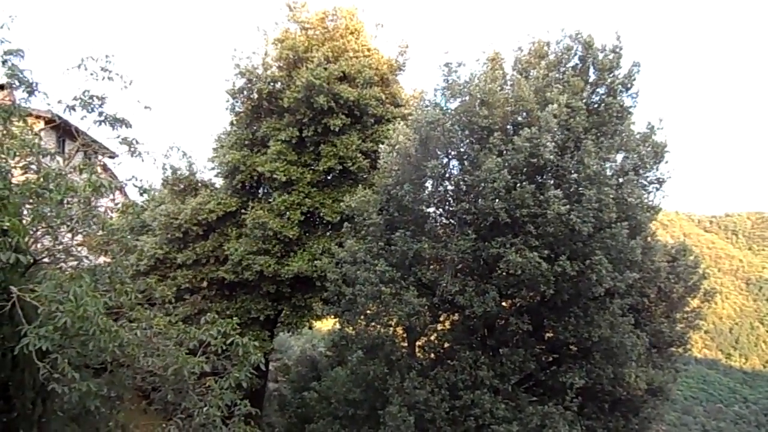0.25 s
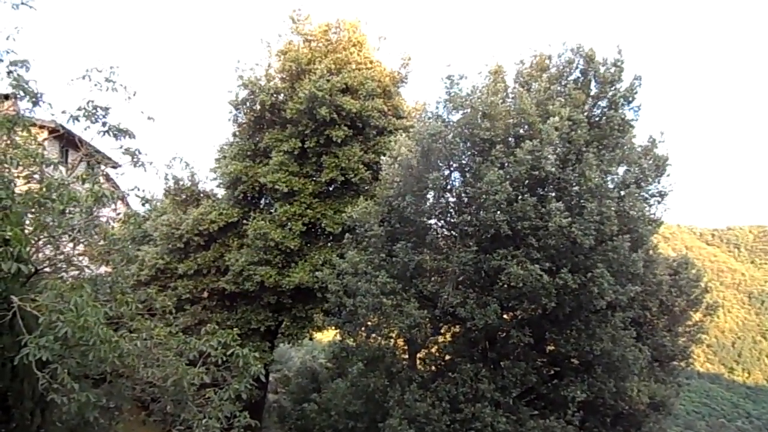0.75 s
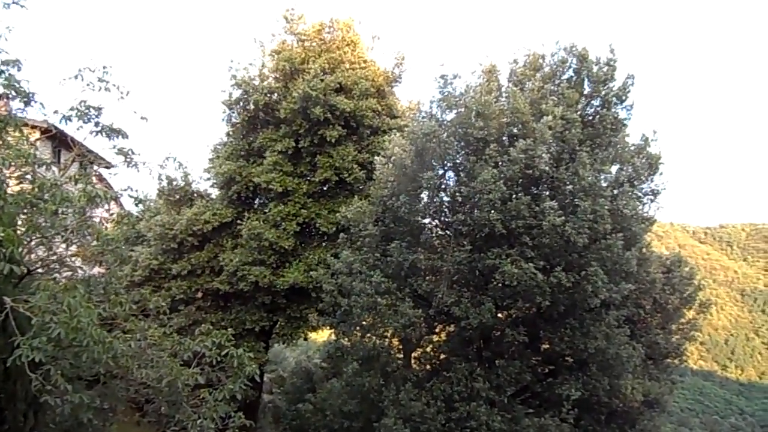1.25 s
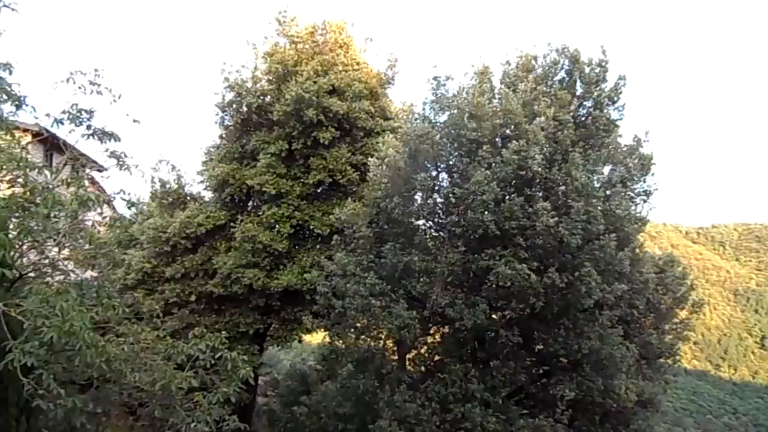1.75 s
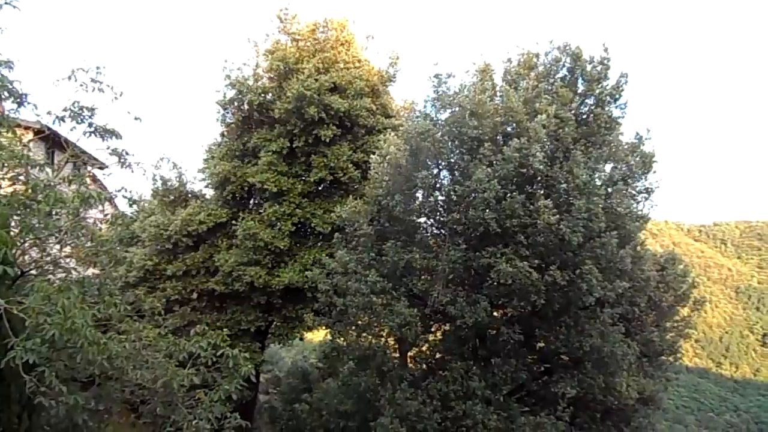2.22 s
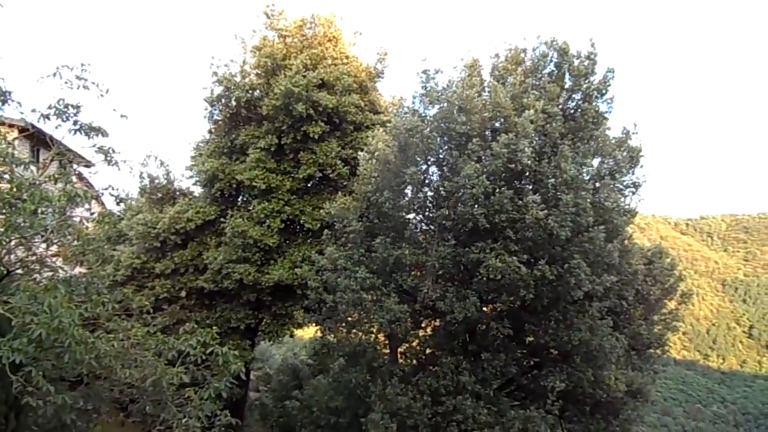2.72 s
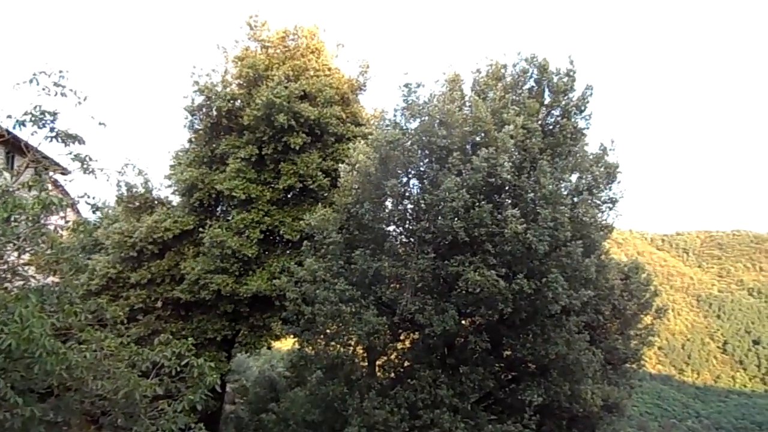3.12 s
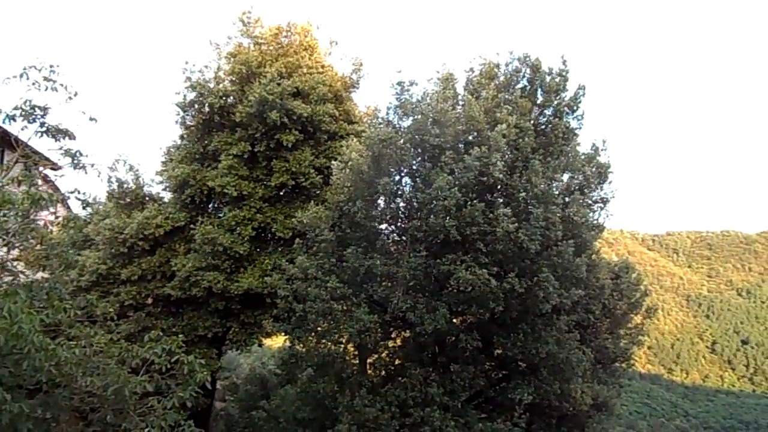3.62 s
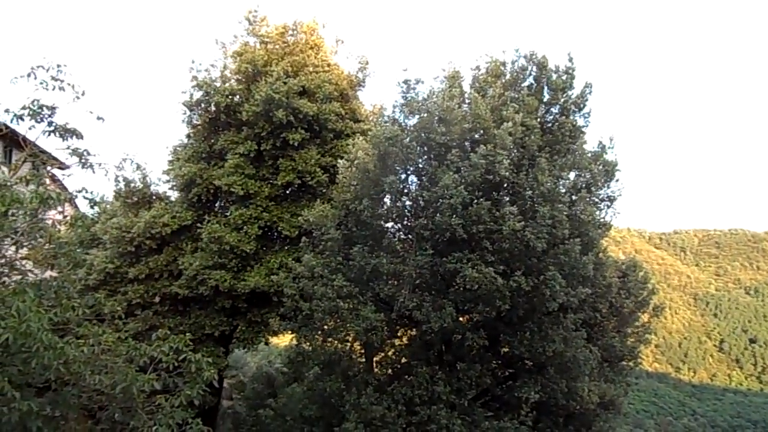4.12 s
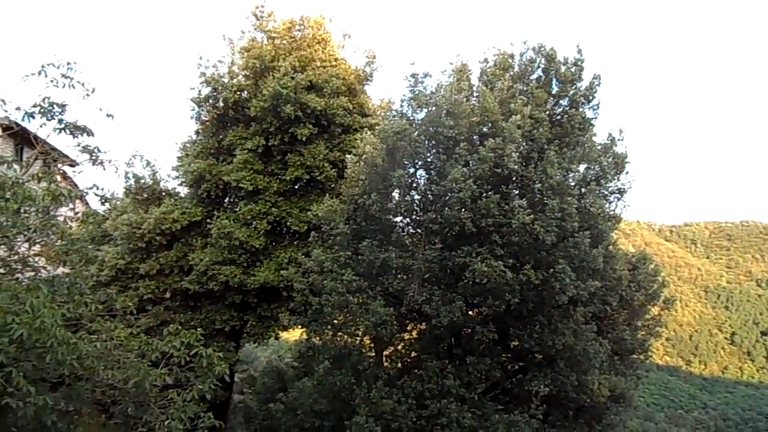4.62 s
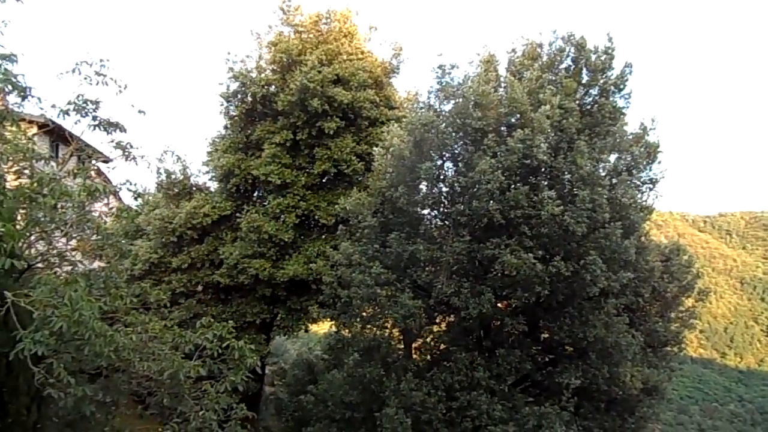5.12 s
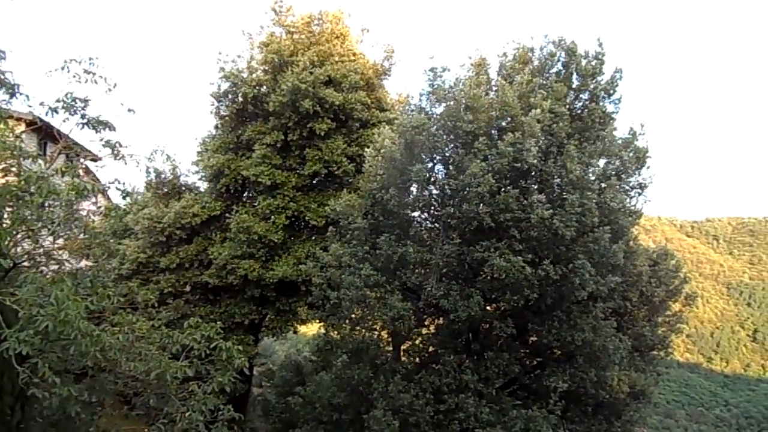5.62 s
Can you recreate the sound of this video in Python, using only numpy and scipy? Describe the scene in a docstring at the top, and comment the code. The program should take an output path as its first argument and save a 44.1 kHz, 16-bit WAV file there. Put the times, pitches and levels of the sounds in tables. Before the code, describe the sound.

On a quiet wooded hillside, faint distant whistles come first, then a songbird builds a fluty, warbling phrase of quick clear notes and slurs. A second bird adds sharp, raspy chips, the strongest near the end after the song stops. Leaves and slopes return a soft echo. A low hum, quiet air hiss and thin camera whine stay underneath, with a tiny tick and soft thumps late.

```python
"""On a quiet hillside a songbird warbles one fluty phrase from the trees; leaves and slopes scatter it back.
Its notes are gliding near-sines: clear whistles linked by slurs under a fast warble.
A second bird calls sharp two-voiced chips with a noisy rasp, and a far one whistles faintly at first.
Under them lie still air made of shaped noise, a low hum, a thin tick and a few soft thumps,
and the thin whine of the camera, made of steady tones and a narrow band of noise."""
import sys
import numpy as np
from scipy import signal
from scipy.fft import rfft, irfft
from scipy.io import wavfile

SR = 44100
rng = np.random.default_rng(int(sys.argv[2]) if len(sys.argv) > 2 else 0)


def to_wav(s):
    """Save 16-bit WAV."""
    ch = np.atleast_2d(s).T  # columns
    pcm = np.round(np.clip(ch, -1, 1) * 32767)  # PCM
    wavfile.write(sys.argv[1], SR, pcm.astype(np.int16))


N = 258426
TIME = np.arange(N) / SR


def gain_of(db):
    """Turns decibels into an amplitude factor."""
    return 10 ** (np.asarray(db) / 20)


def evened(x):
    """Scales a sound to an average (rms) strength of 1."""
    return x / np.sqrt(np.mean(x ** 2) + 1e-20)


def coloured(points):
    """Noise whose spectrum runs through (Hz, dB) points, at rms 1."""
    hz, db = np.transpose(points)
    shape = np.interp(np.log(np.fft.rfftfreq(N, 1 / SR) + 1), np.log(hz + 1), db)
    spectrum = rfft(rng.standard_normal(N)) * gain_of(shape)
    return evened(irfft(spectrum, N))


def band(hz, width_hz):
    """Noise in one bell-shaped band, at rms 1; centred on zero it is a random drift."""
    offset = (np.fft.rfftfreq(N, 1 / SR) - hz) / width_hz
    spectrum = rfft(rng.standard_normal(N)) * np.exp(-2 * offset ** 2)
    return evened(irfft(spectrum, N))


def background():
    """Still air as shaped noise, a low machine hum and the camera's steady whine."""
    # Spectrum of the still air. Each row: frequency in Hz, relative level in dB per Hz.
    air_spectrum = [(3, 2), (13, 5.5), (35, 0.5), (70, -6), (140, -7.5), (260, -11.5), (470, -14),
                    (760, -17), (2100, -22), (7000, -27), (13000, -28), (15500, -27.5), (16400, -27),
                    (16800, -31)]
    # Narrow noise bands of the drone and the whine. Each row: centre in Hz, width in Hz, level in dB.
    drone_bands = [(100, 12, -72.5), (543.5, 12.5, -81), (598, 32, -80.5), (15700, 300, -82)]
    # Steady tones of the hum. Each row: frequency in Hz, level in dB.
    hum_tones = [(30, -80.5), (60, -76), (100, -65)]
    # Cluster of thin tones in the camera whine. Each row: frequency in Hz, level in dB.
    whine_tones = [(11985.3, -86), (15734, -90), (15795.4, -90), (15856.8, -86), (15918.1, -85),
                   (15979.4, -85), (16040.8, -77.5), (16102.1, -77.5), (16163.5, -91)]
    air_db = -59
    air = gain_of(air_db) * coloured(air_spectrum)
    drone = sum(gain_of(db) * band(hz, width) for hz, width, db in drone_bands)
    tones = np.zeros(N)
    for hz, db in hum_tones + whine_tones:
        start_turn = rng.random()
        tones += np.sqrt(2) * gain_of(db) * np.sin(2 * np.pi * (hz * TIME + start_turn))
    return air + drone + tones


def knocks(rise_s=0.0056):
    """A thin tick and soft thumps: quickly damped noise bursts, each in its own band."""
    # Each row: start in seconds, level before the rise and decay in dB, centre in Hz, width in Hz,
    # decay time in seconds.
    bursts = [(3.688, -49, 13570, 1310, 0.0044), (4.108, -54, 577, 79, 0.03), (4.765, -59, 240, 80, .025),
              (5.215, -63, 200, 80, .025)]
    out = np.zeros(N)
    for start, db, hz, width, decay_s in bursts:
        age = np.maximum(TIME - start, 0)
        envelope = (1 - np.exp(-age / rise_s)) * np.exp(-age / decay_s)
        out += gain_of(db) * envelope * band(hz, width)
    return out


def hillside(x, leaves_db, slope_db, leaves_t60=0.35, slope_t60=0.85, flutter=0.47):
    """Direct sound, a few near echoes, quick scatter from foliage and a long, fluttering tail from the slopes."""
    # Near reflections from trunks, wall and ground. Each row: delay in seconds, level in dB.
    reflections = [(.0065, -14.5), (.013, -13), (.02, -14), (.046, -18)]
    t = TIME[:SR]
    # t60: seconds for the decay to fall by 60 dB
    leaves = evened(rng.standard_normal(SR) * gain_of(-60 * t / leaves_t60) * (1 - np.exp(-t / 0.0042)))
    slope = evened(rng.standard_normal(SR) * gain_of(-60 * t / slope_t60) * (1 - np.exp(-t / 0.018)))
    near = gain_of(leaves_db) * leaves / np.sqrt(SR)
    far = gain_of(slope_db) * slope / np.sqrt(SR)
    for delay_s, db in reflections:
        near[round(delay_s * SR)] += gain_of(db)
    near_sound = signal.fftconvolve(x, near)[:N]
    far_sound = signal.fftconvolve(x, far)[:N]
    return x + near_sound + far_sound * (1 + flutter * band(0, 110))


def swell(progress, crest, ends_db):
    """Loudness of a note in dB: it grows to a rounded crest, then falls away."""
    crest = np.clip(crest, .05, .95)
    before = np.maximum(crest - progress, 0) / crest
    after = np.maximum(progress - crest, 0) / (1 - crest)
    return ends_db[0] * before ** 2 + ends_db[1] * after ** 2


def buzz(start, length, from_hz, to_hz, level_db, crest, depth_hz, count=40):
    """A slur slides evenly between two pitches under a fast warble: rows (s, Hz, dB, warble Hz)."""
    progress = np.linspace(0, 1, count)
    hz = from_hz + (to_hz - from_hz) * progress
    db = level_db + swell(progress, crest, ends_db=(-10.5, -10.5))
    return np.column_stack([start + length * progress, hz, db, np.full(count, depth_hz)])


def whistle(start, length, opening_hz, held_hz, closing_hz, level_db, crest, count=40):
    """A clear note scoops onto its held pitch and bends away at the end: rows (s, Hz, dB, warble Hz)."""
    scoop_power, bend_power = 3.0, 3.004  # higher powers keep the glides closer to the note's ends
    progress = np.linspace(0, 1, count)
    scoop = (opening_hz - held_hz) * (1 - progress) ** scoop_power
    bend = (closing_hz - held_hz) * progress ** bend_power
    db = level_db + swell(progress, crest, ends_db=(-10, -10.5))
    return np.column_stack([start + length * progress, held_hz + scoop + bend, db, np.zeros(count)])


def syrinx(notes, warble_hz, jitter, throb_per_hz=0.0016):
    """The bird's voice organ glides through each note and flutters in rough parts: phase and loudness."""
    pitch, loud, depth = np.zeros((3, N))
    for note in notes:
        s, hz, db, warble = np.transpose(note)
        on = (TIME > s[0]) & (TIME < s[-1])
        pitch[on] = np.interp(TIME[on], s, hz)
        depth[on] = np.interp(TIME[on], s, warble)
        # soft edges, 3.3 ms long
        edge = np.clip(np.minimum(TIME[on] - s[0], s[-1] - TIME[on]) / 0.0033, 0, 1)
        loud[on] = gain_of(np.interp(TIME[on], s, db)) * np.sin(edge * np.pi / 2) ** 2
    # the warble's speed wanders around warble_hz
    flutter = 2 * np.pi * np.cumsum(warble_hz * (1 + .42 * band(0, 118.8))) / SR
    pitch = pitch * (1 + jitter * band(0, 405)) + depth * np.sin(flutter)
    # a deep warble also throbs: loudest on each upswing
    loud = loud * (1 + np.tanh(throb_per_hz * depth) * np.cos(flutter))
    return 2 * np.pi * np.cumsum(pitch) / SR, loud


def far_bird(level_db=-2, shake=0.34):
    """Faint, unsteady whistles from deeper in the wood: warbled sines with a shaking level."""
    # Each row: start in seconds, length in seconds, first pitch in Hz, last pitch in Hz,
    # level in dB before level_db is added, loudest point from 0 to 1, warble depth in Hz.
    slurs = [ (.012, .055, 2480, 2100, -61, .65, 80), (.176, 0.044, 2470, 2090, -60.5, .6, 70),
             (.342, 0.083, 2760, 2200, -67.5, .2, 270), (.765, 0.034, 3020, 3760, -64, .5, 9.6),
             (.988, .058, 3126, 2700, -62.5, .35, 180), (1.055, 0.078, 2830, 2530, -62, 0.37, 30), ]
    phase, loud = syrinx([buzz(*row) for row in slurs], warble_hz=131.5, jitter=0.011)
    return np.sqrt(2) * gain_of(level_db) * loud * (1 + shake * band(0, 150)) * np.sin(phase)


def chips(rasp_s=.021, overtone_db=-21, spread_hz=1500):
    """Both sides of the syrinx sweep upward at once, with hoarse overtones, inside a short rasp."""
    # The calls. Each row: time in seconds, tone level in dB, rasp level in dB, pitch factor.
    calls = [(.594, -65, -67.5, 1.04), (2.457, -58.5, -63, 0.96), (3.127, -50, -61.5, 1.02),
             (3.797, -49, -58.5, 1.01), (5.007, -43.5, -53.5, 1.016)]
    # The two sides of the syrinx. Each row: seconds from the call's time, pitch in Hz before the
    # pitch factor, level in dB on top of the tone level, warble depth in Hz.
    low_side = [(-.008, 2750, -22, 27), (.004, 3280, -12, 20), (.011, 3828, -1.5, 20),
                (.018, 4040, -0.5, 50), (.025, 4000, -2, 120)]
    high_side = [(-.036, 3183, -15, 60), (-.016, 3625, -22, 190), (-.005, 4086, -6, 95),
                 (.003, 4870, -4.5, 20), (.011, 5480, -10.5, 20), (.024, 5610, -7, 22)]
    # Spectrum of the rasp. Each row: frequency in Hz, relative level in dB per Hz.
    rasp_spectrum = [(1800, -45), (2800, -4.5), (3900, -0.5), (5700, -7.5), (6400, -20), (8700, -17),
                     (12500, -24), (16000, -32)]
    out, rasp = np.zeros(N), coloured(rasp_spectrum)
    for side in (low_side, high_side):
        notes = []
        for s, level, _, factor in calls:
            notes.append([(s + dt, hz * factor, level + db, warble) for dt, hz, db, warble in side])
        phase, loud = syrinx(notes, warble_hz=261, jitter=0.00753)
        overtones = (np.sin(2 * phase) + np.sin(3 * phase)) / np.sqrt(2)
        # random changes in strength make the overtones hoarse
        hoarse = gain_of(overtone_db) * overtones * band(0, spread_hz)
        out += np.sqrt(2) * loud * (np.sin(phase) + hoarse)
    for s, _, rasp_db, _ in calls:
        out += gain_of(rasp_db) * rasp * np.exp(-.5 * ((TIME - s) / rasp_s) ** 2)
    return out


def singer(notes, overtone_db=-30, glint_hz=12150, glint_width_hz=900, glint_spread_hz=450,
           shake=0.29, firm_db=-43):
    """A fluty near-sine; overtones sound faintly and hoarsely where they pass a resonance near 12 kHz."""
    phase, loud = syrinx(notes, warble_hz=138.8, jitter=0.0058)
    # softly blown parts shake, full notes hold firm
    loud = loud * (1 + shake * band(0, 320) / (1 + (loud / gain_of(firm_db)) ** 2))
    hz = np.gradient(phase) * SR / (2 * np.pi)
    glint = np.zeros(N)
    for k in range(3, 7):
        glint += np.sin(k * phase) / (1 + ((k * hz - glint_hz) / glint_width_hz) ** 2)
    hoarse = gain_of(overtone_db) * glint * band(0, glint_spread_hz)
    return np.sqrt(2) * loud * (np.sin(phase) + hoarse)


def songbird_phrase():
    """The main song: clear whistles and the warbled slurs that link them, sung by the same voice."""
    # Clear notes. Each row: start in seconds, length in seconds, opening pitch in Hz, held pitch in Hz,
    # closing pitch in Hz, level in dB, loudest point from 0 to 1.
    clear_notes = [ (1.351, .022, 3090, 3050, 2750, -66, .45), (1.373, 0.029, 2500, 2080, 1810, -62, .35),
                   (1.431, 0.06, 3080, 3290, 3200, -57, .45), (1.499, 0.041, 1900, 2400, 1900, -53, 0.5),
                   (1.633, .043, 1974, 2680, 2955, -50, 0.57),
                   (1.680, 0.071, 2930, 3025, 2910, -40.5, 0.25),
                   (1.961, 0.033, 1980, 2270, 2520, -50, .45), (1.99, 0.034, 2480, 2638, 2660, -42, 0.51),
                   (2.049, 0.032, 2605, 2470, 2045, -46.5, .5), (2.254, .04, 2803, 3110, 3030, -45.5, .7),
                   (2.327, 0.051, 2680, 2661, 2645, -33, 0.47),
                   (2.475, .042, 2130, 2392, 2295, -38.5, 0.85), (2.605, 0.056, 1666, 1775, 1830, -46, 0.4),
                   (2.788, .02, 1900, 2108, 2250, -47, 0.51), (2.958, .034, 2520, 2720, 2850, -46, .8),
                   (2.995, .028, 3126, 3133, 3080, -38, .35), (3.062, .04, 2040, 2115, 2010, -41, 0.53),
                   (3.306, .046, 1950, 2700, 3020, -41.5, 0.75), (3.349, 0.047, 2980, 3006, 2995, -35, .5),
                   (3.397, .02, 3210, 3266, 3130, -42.5, .35), (3.534, .054, 2404, 2362, 2397, -36, 0.43),
                   (3.618, 0.031, 2408, 2426, 2465, -44, 0.58), ]
    # Warbled slurs. Each row: start in seconds, length in seconds, first pitch in Hz, last pitch in Hz,
    # level in dB, loudest point from 0 to 1, warble depth in Hz.
    slurs = [ (1.395, 0.031, 1780, 2000, -64, .7, 210), (1.431, .057, 2600, 3050, -56, 0.6, 380),
             (1.943, 0.021, 1700, 1980, -64, .6, 10), (2.077, .05, 2980, 2920, -45, 0.48, 110),
             (2.286, 0.046, 3100, 2660, -40, 0.5, 163), (2.512, 0.045, 2200, 2030, -40.5, .3, 100),
             (2.556, .047, 1880, 1630, -51.5, 0.31, 88), (2.806, 0.044, 2520, 2370, -48.5, .5, 260),
             (2.891, 0.062, 2670, 2420, -47.5, 0.24, 100), (2.970, .038, 2820, 3250, -39, .55, 340),
             (3.099, .024, 1870, 1540, -51, .4, 60), (3.288, 0.026, 1480, 1980, -60, .7, 20),
             (3.408, .058, 2950, 2880, -46, 0.1, 64), (3.507, 0.032, 2730, 2390, -46, 0.53, 170), ]
    return singer([whistle(*row) for row in clear_notes]) + singer([buzz(*row) for row in slurs])


def scene():
    """Three birds, each with its own share of echo, over the quiet background."""
    birds = hillside(songbird_phrase(), leaves_db=-14, slope_db=-17.5)
    birds += hillside(chips(), leaves_db=-11.5, slope_db=-19.5)
    birds += hillside(far_bird(), leaves_db=-8.5, slope_db=-10.5)
    return (birds + knocks() + background())[None]


def record(dry):
    """The recorder's band limit: a steep filter removes the highest treble."""
    edge_hz = 17180
    low_pass = signal.firwin(1023, edge_hz, window=("kaiser", 9), fs=SR)
    return signal.oaconvolve(dry, low_pass[None], "same")


dry = scene()
out = record(dry)
to_wav(out)
```